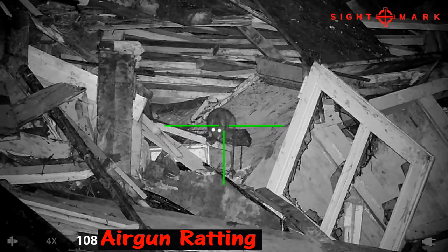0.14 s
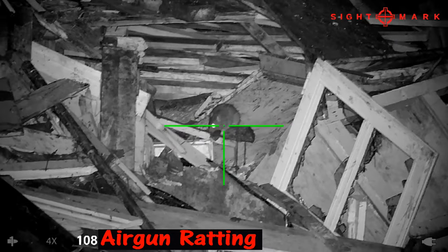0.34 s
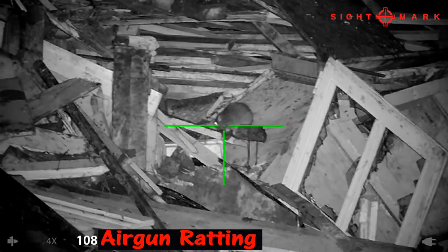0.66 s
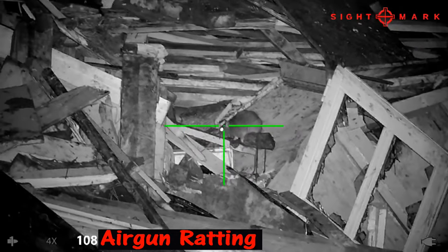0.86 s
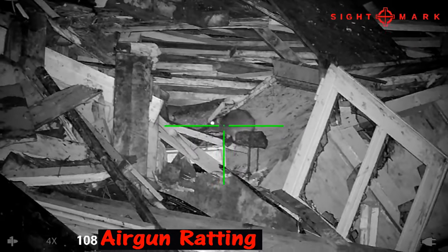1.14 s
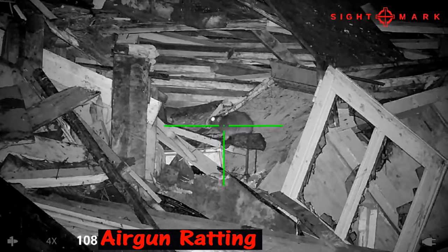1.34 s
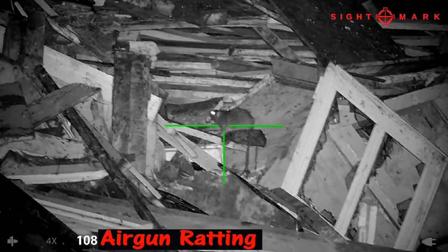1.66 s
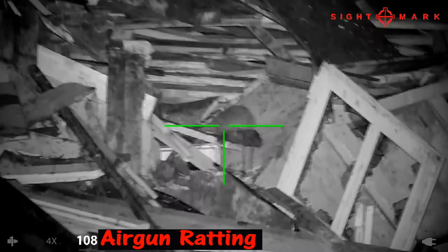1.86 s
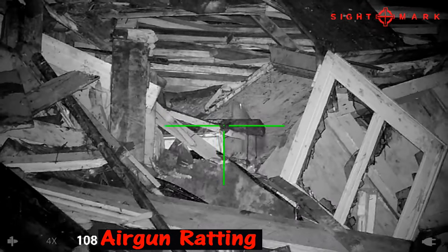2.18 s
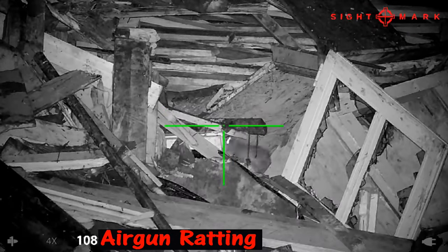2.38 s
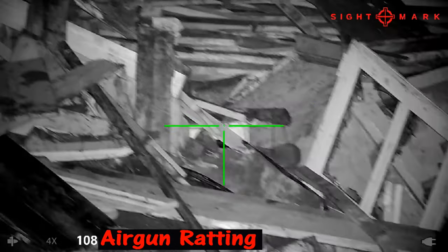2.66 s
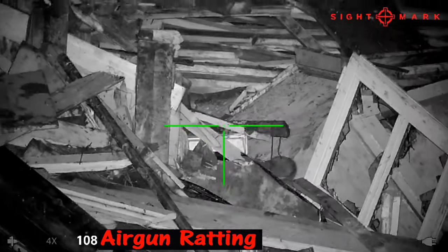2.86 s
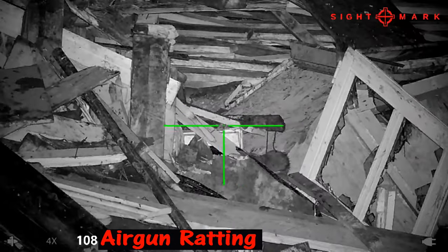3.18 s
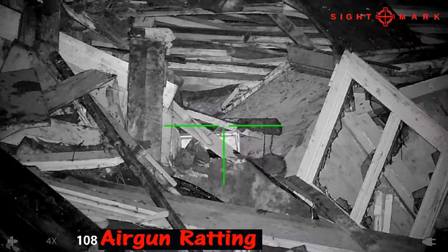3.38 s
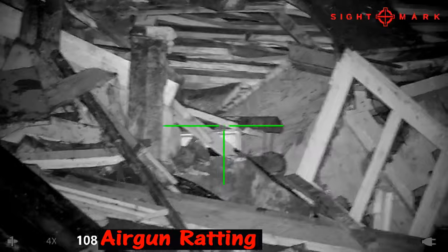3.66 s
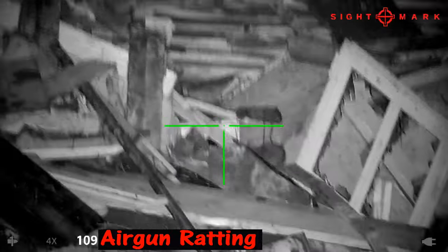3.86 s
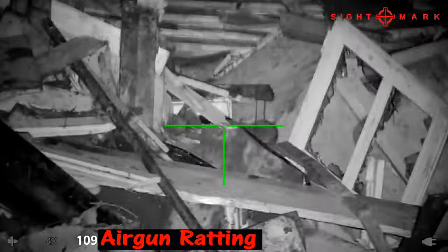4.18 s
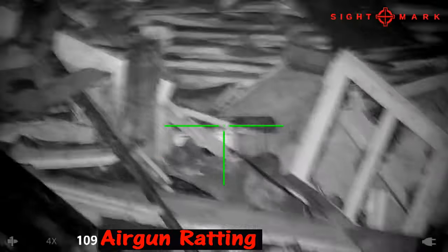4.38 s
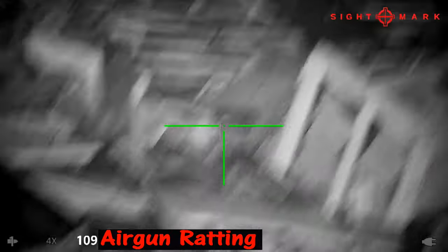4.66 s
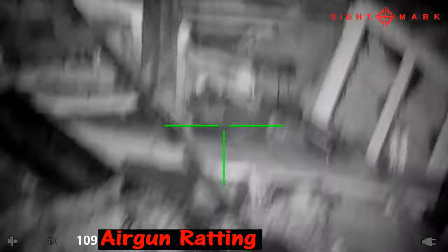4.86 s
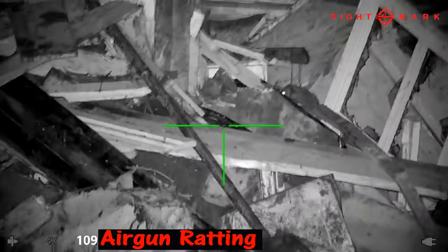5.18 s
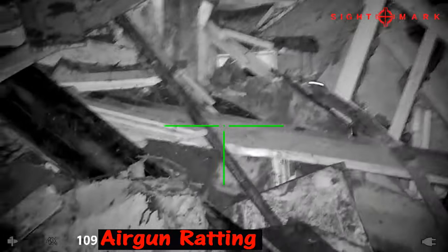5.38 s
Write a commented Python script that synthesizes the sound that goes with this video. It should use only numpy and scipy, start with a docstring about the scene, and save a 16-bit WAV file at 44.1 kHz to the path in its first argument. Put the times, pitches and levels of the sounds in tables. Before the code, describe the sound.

For almost two seconds there is only the faint hiss of still night air outdoors. At about 1.8 seconds an air rifle fires right at the microphone: one sharp, bright crack with a metallic edge and a small thump, slightly overloaded. At 2.0 seconds the pellet smacks into old timber with a brief woody clatter. The shot echoes off walls and trees and fades by about 3 seconds, with a few faint, dull knocks. From about 4 seconds small ticks and rubs come from the rifle. The loading lever clicks open at 4.4 seconds and snaps shut crisply at 4.6, with a thin ring of steel. Lighter knocks, ticks and soft bumps of hands on the stock follow until just after 5 seconds. Underneath, a faint, low, distant rush swells toward 4.9 seconds and eases off by the end at 5.5.

```python
"""Air rifle in a farmyard at night

An air rifle fires, its report overloading the microphone on its sight. The pellet smacks into
a heap of old timber, a derelict shed rings on, and walls and trees throw the shot back.
Then the shooter works the loading lever: it clicks open and snaps shut, steel ringing,
while hands bump and rumble on the stock and a low, far-off rush swells in the night air."""
import sys
import numpy as np
from scipy import signal
from scipy.fft import rfft, irfft, next_fast_len
from scipy.io import wavfile

SR = 44100
rng = np.random.default_rng(int(sys.argv[2]) if len(sys.argv) > 2 else 0)


def dump(signal):
    """Clip the signal to [-1, 1] and save it as 16-bit WAV at the path in sys.argv[1]."""
    limited = np.clip(np.atleast_2d(signal).T, -1, 1)
    pcm = np.round(limited * 32767).astype(np.int16)
    wavfile.write(sys.argv[1], SR, pcm)


N = 243873
TIME = np.arange(N) / SR
SHOT_S = 1.8214


def amp(db):
    """Decibels to gain."""
    return 10 ** (np.asarray(db) / 20)


def at_hz(points, hz):
    """Read a table on a log-frequency axis."""
    f, value = np.transpose(points)
    return np.interp(np.log(hz), np.log(f), value)


def lifts(resonances, hz):
    """The dB that a set of resonances adds at each frequency."""
    return sum(db / (1 + (2 * (hz - f) / width) ** 2) for f, width, db in resonances)


def bin_hz(size):
    """Frequencies of a spectrum's bins, kept above zero."""
    return np.maximum(np.arange(size // 2 + 1) * SR / size, 1)


def noise(colour_db, size):
    """Random-phase noise of rms 1 with the given colour (Hz -> dB)."""
    hz = bin_hz(size)
    x = irfft(amp(colour_db(hz)) * np.exp(2j * np.pi * rng.random(len(hz))), size)
    return x / np.std(x)


def noise_bed(colour, fader):
    """Lasting noise of one colour that rides a level curve."""
    gain = amp(np.interp(TIME, *np.transpose(fader)))
    return gain * noise(lambda hz: at_hz(colour, hz), next_fast_len(N))[:N]


def swell(t, rise, t60):
    """Envelope with a linear attack and an exponential decay."""
    return np.clip(t / rise, 0, 1) * amp(-60 * np.maximum(t - rise, 0) / t60)


def add(out, start_s, x):
    """Mix x into out from start_s."""
    i = int(np.clip(start_s * SR, 0, N - 1))
    out[i:i + len(x)] += x[:N - i]


def ring(modes, spread_db=0, size=22050):
    """Decaying sines of a struck body; spread_db varies their balance from hit to hit."""
    t = TIME[:size]
    return sum(amp(db + spread_db * rng.normal()) * np.sin(2 * np.pi * hz * t) * swell(t, .002, t60)
               for hz, db, t60 in modes)


def fade_bands(x, loss):
    """Each band of x dies at its own rate, read from the loss table in dB per second."""
    centres = np.geomspace(125, 16000, 15)
    hz, spectrum = bin_hz(len(x)), rfft(x)
    shares = [np.interp(np.log(hz), np.log(centres), row) for row in np.eye(len(centres))]
    return sum(irfft(spectrum * share, len(x)) * amp(-at_hz(loss, f) * TIME[:len(x)])
               for f, share in zip(centres, shares))


def blow(colour_db, t60, rise=.0005, size=4096):
    """A brief crunch of noise, rung through a body of the given colour (Hz -> dB)."""
    envelope = swell(TIME[:size // 2], rise, t60)
    # minimum phase: the body rings only after it is touched
    cepstrum = irfft(np.log(amp(colour_db(bin_hz(size)))))[:size // 2]
    body = np.exp(rfft(2 * cepstrum, size) - cepstrum[0])
    crunch = rng.standard_normal(size // 2) * envelope
    x = irfft(rfft(crunch, size) * body)
    return x * np.sqrt(np.sum(envelope ** 2) / np.sum(x ** 2))


def night(air_db=-68.5):
    """Still air with a faint hiss, and a low far-off rush that swells later on."""
    # colour of the night air: freq_hz, relative_db
    air_colour = [(25, -8), (60, -9), (100, -5.5), (135, -2.5), (190, -4), (235, -8), (275, -3.5),
                  (330, -9.5), (700, -9.5), (950, -13), (1500, -21), (2500, -24.5), (5000, -26),
                  (16000, -32)]
    # colour of the rush: freq_hz, relative_db
    rush_colour = [(30, -32.5), (70, -17), (130, -5), (300, 2.5), (500, -1.5), (900, -16), (2000, -33),
                   (8000, -44)]
    # its swell: time_s, level_db
    rush_fader = [(0, -89), (2.3, -80.5), (3.8, -68.5), (4.9, -65), (5.53, -71)]
    return noise_bed(air_colour, [(0, air_db)]) + noise_bed(rush_colour, rush_fader)


def contacts(hits, ring_db, width_octaves=.2):
    """Rifle parts meet: each hit crunches round the pitch of its part and leaves the steel ringing."""
    # colour of a click coming through the rifle: freq_hz, relative_db
    click_colour = [(100, -17), (330, -12), (520, -20), (850, -19), (1350, -2), (2300, -8), (3500, 1),
                    (4500, -5), (5400, -2.5), (6700, -8), (7800, -5), (11000, -14), (13000, -23),
                    (16000, -28)]
    # thin after-ring of the steel: pitch_hz, level_db, t60_s
    steel_modes = [(1260, -36, 0.086), (2700, -40, .09), (3553, -29, .055), (5150, -41, .09),
                   (5841, -38, .055), (6428, -46, .14), (9356, -51.5, 0.12), (9927, -49.5, .14),
                   (11200, -43, .11)]
    out = np.zeros(N)
    for start_s, db, t60, pitch_hz, lift_db, tilt in hits:
        def colour(hz):
            octaves = np.log2(hz / pitch_hz)
            peak_db = lift_db * np.exp(-(octaves / width_octaves) ** 2)
            return at_hz(click_colour, hz) + tilt * np.maximum(octaves, -2) + peak_db
        add(out, start_s, amp(db) * blow(colour, t60))
        add(out, start_s, amp(db + ring_db) * ring(steel_modes, spread_db=4))
    return out


def firing():
    """The sear lets go, the hammer hits the valve and rings the receiver, the muzzle pops."""
    # sear, hammer, muzzle: start_s, level_db, t60_s, pitch_hz, lift_db, tilt_db_per_octave
    hits = [(1.8158, -34, .027, 4200, 1, -4.5), (1.8214, -7, .021, 1500, 2, -2.5),
            (1.823, -16, .026, 650, 22, -3)]
    # ring of the receiver: pitch_hz, level_db, t60_s
    receiver_modes = [(205, -25, .07), (510, -27, 0.096), (659, -13.5, .03), (1131, -24, .11),
                      (2673, -25, 0.11)]
    out = contacts(hits, ring_db=-7)
    add(out, SHOT_S, ring(receiver_modes))
    return out


def report(level_db=-8, attack_s=.0039, length_s=.06, fall_bend=2.5, size=4096):
    """The valve opens: a rush of air through the action's resonances holds, then collapses."""
    # rush of air and rattle of the action: freq_hz, relative_db
    blast_colour = [(40, -38), (100, -22), (200, -15), (280, -20), (500, -5), (900, -8), (1400, -3.5),
                    (2300, -6), (4200, -0.5), (5800, -4.5), (7500, -4), (9800, -4.5), (12000, -15.5),
                    (16000, -21)]
    # resonances of barrel and action: centre_hz, width_hz, lift_db
    action_peaks = [(535, 60, 4), (1150, 45, 4), (3230, 35, 2.5), (3370, 30, 6.5), (3700, 35, 3),
                    (3730, 35, 4), (4050, 60, 3), (4330, 40, 3), (4680, 80, 4), (5190, 130, 3),
                    (6300, 70, 4), (7900, 42, 7), (10220, 60, 6)]
    t, out = TIME[:size], np.zeros(N)
    fall_db = -60 * (t / length_s) ** fall_bend
    air = noise(lambda hz: at_hz(blast_colour, hz) + lifts(action_peaks, hz), size)
    add(out, SHOT_S, air * amp(level_db + fall_db) * np.minimum(t / attack_s, 1))
    return out


def stock(recoil_s=1.838):
    """The stock thumps with the recoil, then bumps and rumbles under shifting hands."""
    # low modes of the stock: pitch_hz, level_db, t60_s
    stock_modes = [(99, -37, 0.37), (111, -35.5, .12), (126, -29, .19), (235, -48, .22), (355, -54.5, .15)]
    # soft knocks of the hands: start_s, level_vs_recoil_db
    bumps = [(4.385, -30), (4.429, -29), (4.59, -27), (4.632, -26), (4.832, -26), (4.896, -27.5)]
    # handling rumble: freq_hz, relative_db
    rumble_colour = [(15, 6), (30, 4), (60, -14), (110, -28), (200, -42), (600, -66)]
    # its rise and fall: time_s, level_db
    rumble_fader = [(3.4, -72), (4.2, -59), (4.4, -47), (4.52, -53), (4.65, -41), (4.85, -46), (5.1, -53),
                    (5.53, -65)]
    out = noise_bed(rumble_colour, rumble_fader)
    for start_s, db in [(recoil_s, 0)] + bumps:
        add(out, start_s, amp(db) * ring(stock_modes))
    return out


def yard(x, reflectors, colour, wet_db, size=48000):
    """Ground, walls and trees scatter the sound back; the air takes the treble from the late echoes."""
    # loss on the way: freq_hz, loss_db_per_s
    air_loss = [(200, 10), (2000, 12), (3500, 22), (5200, 28), (7000, 55), (10000, 58), (16000, 95)]
    t = TIME[:size]
    power = sum((amp(db) * swell(t - delay, rise, t60)) ** 2 for delay, db, rise, t60 in reflectors)
    scatter = noise(lambda hz: at_hz(colour, hz), size) * np.sqrt(power)
    response = fade_bands(scatter, air_loss)
    return amp(wet_db) * signal.fftconvolve(x, response / np.sqrt(np.sum(response ** 2)))[:N]


def near_echoes(x):
    """A quick, bright slap off the walls beside the shooter."""
    # near reflectors: delay_s, relative_db, rise_s, t60_s
    reflectors = [(.02, -9.5, .02, .3), (.06, 3, .012, .11), (.08, -7, .04, .45)]
    # colour of the slap: freq_hz, relative_db
    colour = [(100, -9), (300, -3), (700, 2.5), (1800, 4.5), (3000, -1.5), (5200, 1.5), (9000, 3.5),
              (15000, 5.5)]
    return yard(x, reflectors, colour, wet_db=-29)


def far_echoes(x):
    """A long tail rolling back from far down the yard."""
    # far reflectors: delay_s, relative_db, rise_s, t60_s
    reflectors = [(.09, 0, .05, 1.62), (.38, -5.5, .08, .56)]
    # colour of the tail: freq_hz, relative_db
    colour = [(100, -12.5), (300, -3.5), (700, 3), (1500, 2.5), (2150, 6.5), (2900, 0), (4200, -2),
              (5100, 3), (5800, -2), (9000, -1.5), (15000, -6)]
    return yard(x, reflectors, colour, wet_db=-31.5)


def pellet(strike_s=1.995, strike_db=-13.5, first_gap_s=.0055, shed_db=-37, size=32768):
    """The pellet smacks the boards, which clatter; the shed rings on, duller as it dies."""
    # splintering wood: freq_hz, relative_db
    timber_colour = [(80, -45.5), (200, -27.5), (340, -11.5), (600, -7.5), (1150, -1), (2000, -4),
                     (3000, -6.5), (4000, -7), (4850, -0.5), (5800, -13.5), (6600, -5.5), (8500, -17),
                     (12000, -23.5), (16000, -31.5)]
    # resonances of the boards: centre_hz, width_hz, lift_db
    board_peaks = [(820, 120, 3), (965, 66, 4), (1140, 60, 3.5), (1420, 90, 3), (1894, 80, 4.5),
                   (2370, 220, 3), (3535, 150, 4), (4780, 270, 3.5)]
    # dull, fading knocks and echoes after the strike: start_s, level_db, tilt_db_per_octave
    late_knocks = [(2.127, -43, -5), (2.2355, -51, -4.5), (2.65, -59, -13.5), (2.743, -68.5, -3)]
    # decay of the shed's ring: freq_hz, loss_db_per_s
    shed_loss = [(200, 90), (1300, 91), (3000, 182), (6000, 203), (14000, 261.5)]

    def wood(tilt):
        return lambda hz: (at_hz(timber_colour, hz) + lifts(board_peaks, hz)
                           + tilt * np.log2(np.maximum(hz / 1200, 1)))
    out = np.zeros(N)
    for k in range(4):  # the strike, then clatter at widening gaps, softer and duller each time
        smack = blow(wood(tilt=-.3 - 1.4 * k), t60=.042, rise=.00022)
        add(out, strike_s + first_gap_s * k ** 2, amp(strike_db - 7.8 * k) * smack)
    for start_s, db, tilt in late_knocks:
        add(out, start_s, amp(db) * blow(wood(tilt), t60=.09, rise=.005))
    shed = fade_bands(noise(wood(tilt=0), size), shed_loss)
    add(out, strike_s, amp(shed_db) * shed * np.minimum(TIME[:size] / .0068, 1))
    return out


def loading(stop_lift_db=10, cocked_s=4.428):
    """The lever hits its stops and cocks the singing hammer spring, amid knocks, ticks and rubs."""
    # lever pulled open, pushed home, latched: start_s, level_db, t60_s, pitch_hz, tilt_db_per_octave
    stops = [(4.425, -29, .023, 1400, -2.5), (4.6228, -29.5, .023, 3900, -.5),
             (4.6455, -11, .007, 3700, 4.5)]
    # dull knocks of the action in the stock: start_s, level_db
    knocks = [(4.6007, -40), (4.665, -50), (4.802, -53), (4.8083, -41), (4.8212, -41.5), (4.828, -48)]
    # bright ticks of loose fittings: start_s, level_db
    ticks = [(3.692, -63.5), (4.1066, -54.5), (4.3397, -53.5), (4.415, -50.5), (4.615, -51.5), (4.894, -51),
             (5.0012, -60.5), (5.0484, -47)]
    # brief rubs of sliding parts: start_s, level_db
    rubs = [(2.716, -68), (4.355, -59), (4.3846, -53), (4.584, -56), (4.901, -56), (4.913, -54),
            (5.057, -61.5), (5.4843, -65)]
    # ring of the hammer spring: pitch_hz, level_db, t60_s
    spring_modes = [(1287, -51, 0.098), (2864, -55, 0.19), (3200, -55, 0.099), (3585, -57, 0.076),
                    (4560, -41, 0.027)]

    def voiced(cues, t60, pitch_hz, tilt, lift_db=8):
        return [(start_s, db, t60, pitch_hz, lift_db, tilt) for start_s, db in cues]
    hits = []
    for start_s, db, t60, pitch_hz, tilt in stops:
        touch = (start_s, db, t60, pitch_hz)
        landing = (start_s + .0011, db - 3.5, t60, pitch_hz * 1.9)  # on a smaller, higher part
        rebound = (start_s + .0072, db - 24, .022, pitch_hz)
        hits += [(*hit, stop_lift_db, tilt) for hit in (touch, landing, rebound)]
    hits += voiced(knocks, t60=.016, pitch_hz=3100, tilt=-7)
    hits += voiced(ticks, t60=.018, pitch_hz=4000, tilt=-1)
    hits += voiced(rubs, t60=.06, pitch_hz=4100, tilt=-4)
    out = contacts(hits, ring_db=-6)
    add(out, cocked_s, ring(spring_modes))
    return out


def scene(loading_send_db=-2):
    """Firing and loading wake the near walls; only the report, thrown forward, reaches the far ones."""
    blast = report()
    shot = blast + firing()
    reload = loading()
    echoes = near_echoes(shot + amp(loading_send_db) * reload) + far_echoes(blast)
    return (shot + reload + echoes + stock() + pellet() + night())[None]


def record(dry, ceiling=.46, low_cut_hz=95, high_cut_hz=16000):
    """The microphone overloads on the report; deep bass and the very top are cut."""
    clipped = dry / (1 + (dry / ceiling) ** 6) ** (1 / 6)
    low_cut = signal.butter(3, low_cut_hz, "high", fs=SR, output="sos")
    high_cut = signal.firwin(201, high_cut_hz, fs=SR)
    return signal.fftconvolve(signal.sosfilt(low_cut, clipped), high_cut[None], "same")


dry = scene()
out = record(dry)
dump(out)
```